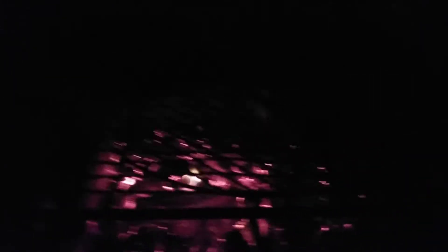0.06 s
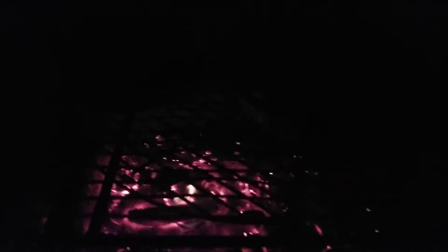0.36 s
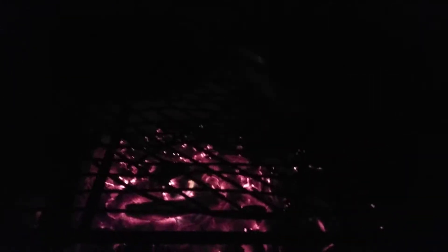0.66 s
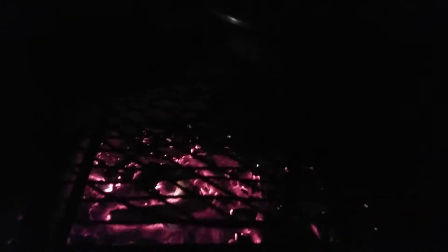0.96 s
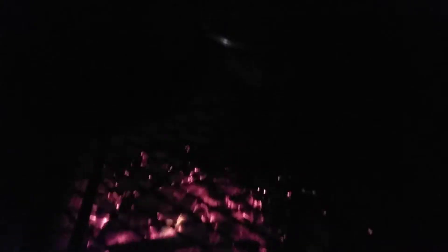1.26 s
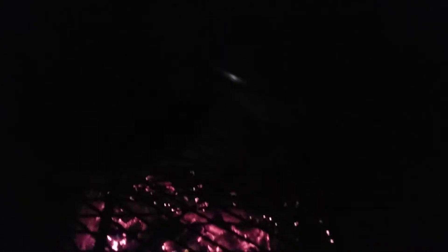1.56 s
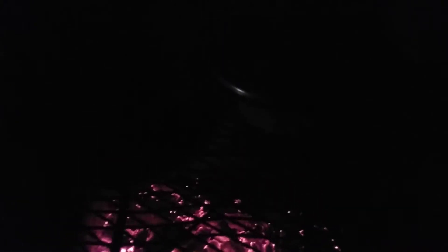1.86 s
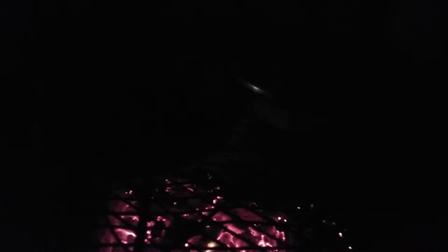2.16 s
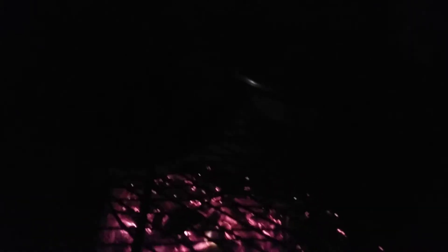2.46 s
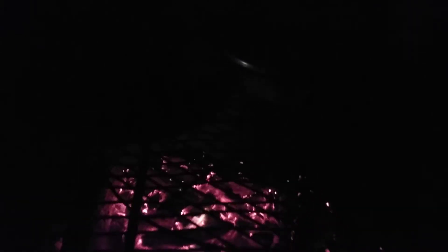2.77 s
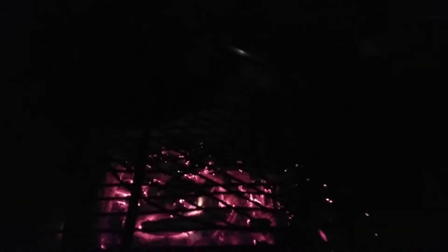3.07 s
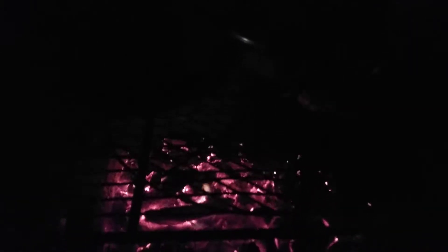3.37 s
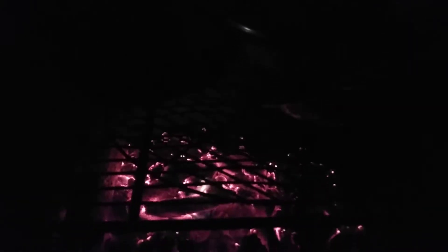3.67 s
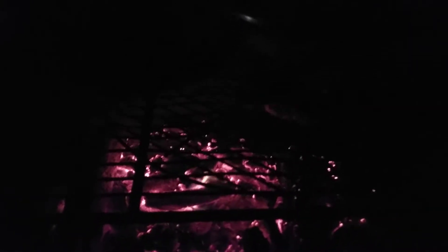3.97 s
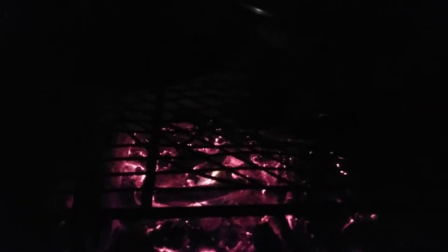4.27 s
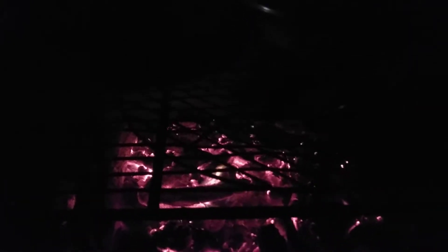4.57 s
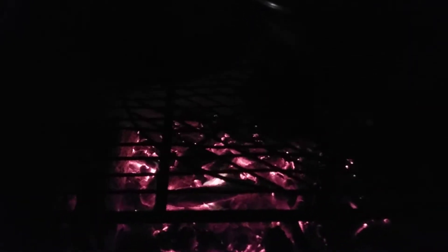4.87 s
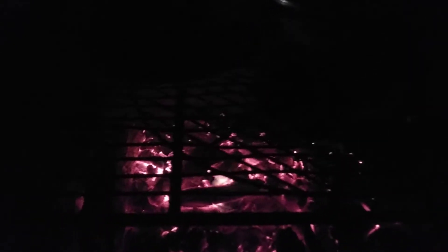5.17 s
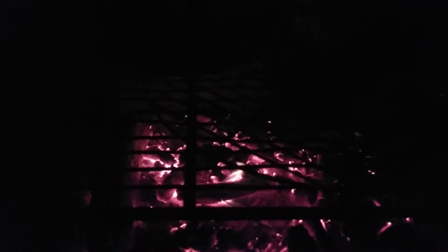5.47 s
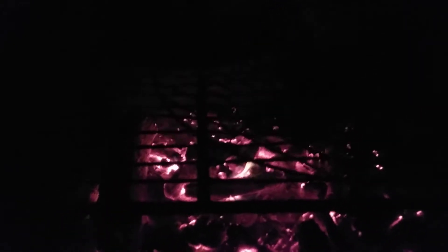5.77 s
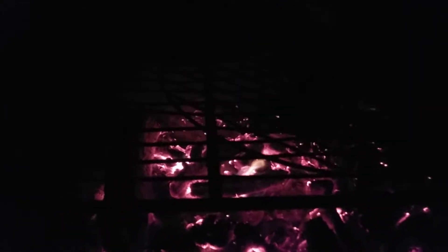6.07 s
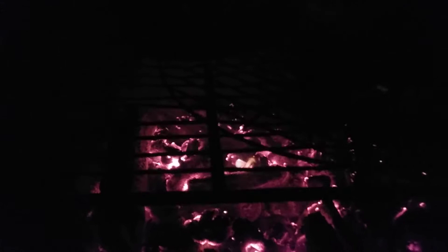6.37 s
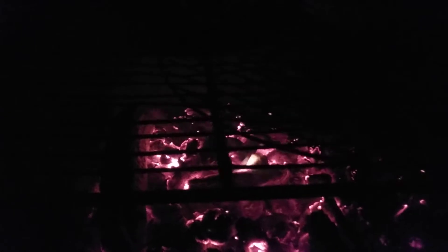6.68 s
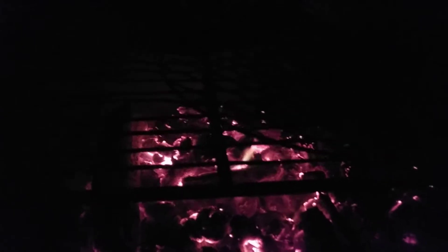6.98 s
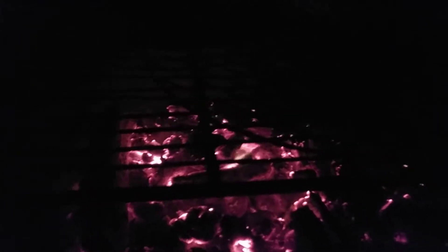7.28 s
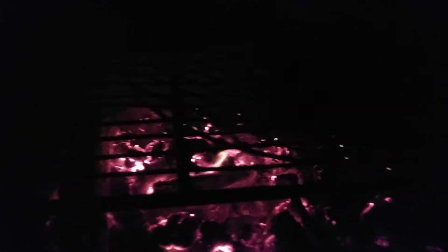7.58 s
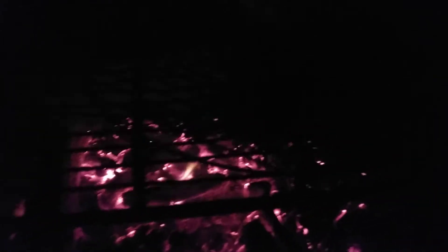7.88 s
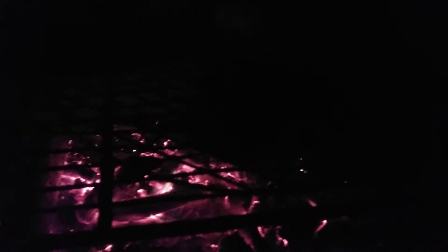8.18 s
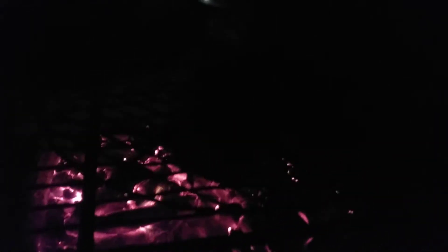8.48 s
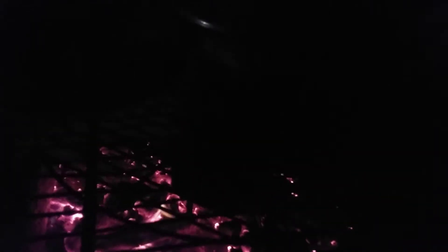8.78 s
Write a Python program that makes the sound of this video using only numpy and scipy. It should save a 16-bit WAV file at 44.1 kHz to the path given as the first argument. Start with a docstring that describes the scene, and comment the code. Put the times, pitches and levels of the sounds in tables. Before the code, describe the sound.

A steel grate grinds over a charcoal grill, then a metal utensil clinks, scrapes and screeches on the bars above faintly ticking embers.

```python
"""A steel grate grinds over the hollow firebox of a charcoal grill, outdoors at night.
Stick-slip friction drives the grate's resonances, and the firebox hums on after it. Embers hiss and
tick throughout, over a soft rush of air, and the charcoal twice gives a dry crack. A blade clinks on
the bars (impacts exciting damped modes), scrapes along them (friction feeding its bending modes),
then screeches under a hard shove and springs free to ring alone."""
import sys
import numpy as np
from scipy import signal
from scipy.fft import rfft, irfft, next_fast_len
from scipy.io import wavfile
from scipy.ndimage import uniform_filter1d, minimum_filter1d, map_coordinates

SR = 44100
rng = np.random.default_rng(int(sys.argv[2]) if len(sys.argv) > 2 else 0)


def transcribe(u):
    """Save the signal u as a 16-bit wav file named by the first command-line argument.

    u: samples, shape (n,) or (channels, n), limited to [-1, 1]; the rate is SR.
    q: integer samples, one column per channel.
    """
    v = np.clip(np.atleast_2d(u).T, -1, 1)
    q = np.round(v * 32767).astype(np.int16)
    wavfile.write(sys.argv[1], SR, q)


N = 393501


def amp(db):
    """Decibels to amplitude ratio."""
    return 10 ** (np.asarray(db) / 20)


def unit(x):
    """Normalisation to rms 1."""
    return x / np.sqrt(np.mean(x ** 2) + 1e-20)


def along(points, hz):
    """Interpolation of (frequency_hz, value) points on a log frequency axis."""
    f, values = np.transpose(points)
    return np.interp(np.log(hz + 1), np.log(f + 1), values)


def curves(rows):
    """Linear interpolation in time: one value per sample for each column after the first."""
    times, *columns = np.transpose(rows)
    return [np.interp(np.arange(N) / SR, times, column) for column in columns]


def swell(start_s, attack_s, hold_s, release_s, depth_db=24.5):
    """Exponential envelope: a gain rises, holds and falls evenly in dB, then drops away."""
    t = np.arange(N) / SR - start_s
    below = np.clip(np.maximum(1 - t / attack_s, (t - attack_s - hold_s) / release_s), 0, 2)
    return amp(-depth_db * np.maximum(below, below ** 3)) * (t > 0)


def wobble(rate_hz):
    """Random modulation: a smooth curve through rate_hz knots a second."""
    knots = rng.standard_normal(int(N * rate_hz / SR) + 4)
    return map_coordinates(knots, [np.arange(N) * rate_hz / SR])


def filtered(x, response):
    """Linear filtering: the spectrum of x times a frequency response."""
    size = next_fast_len(len(x) + 8192)
    return irfft(rfft(x, size) * response(np.fft.rfftfreq(size, 1 / SR)), size)[:len(x)]


def band(x, lo_hz, hi_hz, order=3):
    """Causal band-pass filtering."""
    sections = signal.butter(order, [lo_hz, min(hi_hz, SR / 2 - 1)], "band", fs=SR, output="sos")
    return signal.sosfilt(sections, x)


def resonate(x, modes):
    """Forced vibration: x drives (pitch_hz, width_hz, level_db) modes of alternating sign."""
    return filtered(x, lambda f: sum(
        (-1) ** k * amp(db) * 1j * f * width / (hz * hz - f * f + 1j * f * width)
        for k, (hz, width, db) in enumerate(modes)))


def sing(x, hz, width_hz):
    """Resonance: x through a double pole whose frequency may glide, at rms 1."""
    carrier = np.exp(2j * np.pi * np.cumsum(hz * np.ones(N)) / SR)
    pole = np.exp(-np.pi * width_hz / SR)
    return unit(np.real(carrier * signal.lfilter([1], [1, -2 * pole, pole ** 2], x / carrier)))


def ringing(modes, t60, t):
    """Modal superposition: damped (pitch_hz, level_db, t60_ratio) sines of random strength and sign."""
    hz, mode_db, t60_ratio = np.transpose(modes)[:, :, None]
    sizes = amp(mode_db + 2.5 * rng.standard_normal(hz.shape)) * rng.choice([-1, 1], hz.shape)
    return np.sum(sizes * amp(-60 * t / (t60 * t60_ratio)) * np.sin(2 * np.pi * hz * t), 0)


def glide(x, ratio):
    """Resampling: all modes shift together by a pitch ratio."""
    return map_coordinates(x, [np.cumsum(ratio)], mode="wrap")


def shimmer(x, depth_db, width_hz, step_s):
    """Amplitude modulation: modes swell and fade independently as the contact changes."""
    hz, t, spectrum = signal.stft(x, SR, nperseg=512)
    knots = rng.standard_normal((int(hz[-1] / width_hz) + 2, int(t[-1] / step_s) + 2))
    field = map_coordinates(knots, np.meshgrid(hz / width_hz, t / step_s, indexing="ij"), order=1)
    return unit(signal.istft(spectrum * amp(depth_db * field), nperseg=512)[1][:N])


def friction(rate_hz, scatter, spread_db, smooth):
    """Stick-slip excitation: impulses of uneven spacing and size, over a share of smooth noise."""
    draw = rng.standard_normal((int(2 * rate_hz * N / SR), 2))
    at = (np.cumsum(np.exp(scatter * draw[:, 0])) * SR / rate_hz).astype(int)
    slips = np.bincount(at[at < N], amp(spread_db * draw[at < N, 1]), N)
    return unit(slips - slips.mean()) + smooth * rng.standard_normal(N)


def add(track, start_s, sound):
    """Superposition: mix a sound into the track."""
    span = track[max(round(start_s * SR), 0):][:len(sound)]
    span += sound[:len(span)]


# Force of the drag: time_s, force_db
DRAG_FORCE = [(0.0, -64), (0.368, -39.5), (0.556, -44.5), (0.626, -39), (0.682, -42), (0.826, -34.5),
              (0.99, -40.5), (1.006, -29.5), (1.072, -25.5), (1.084, -31.5), (1.112, -29.5), (1.142, -36),
              (1.202, -33.5), (1.396, -54.5), (1.47, -52.5)]
# Treble of the drag relative to its force: time_s, level_db
DRAG_SHEEN = [(0.1, -5), (0.4, -7.5), (0.86, -0.5), (1.05, -8), (1.15, -15), (1.4, -14.5)]
# Spectral envelope of the grinding: frequency_hz, gain_db
DRAG_SPECTRUM = [(35, -82), (60, -59), (168, -21), (268, -16.5), (346, -6.5), (469, 0), (903, -4.5),
                 (968, -7), (1470, 2.5), (2900, -9.5), (3940, -16), (5090, -11.5), (6580, -12),
                 (9130, -31.5), (13000, -36), (16000, -47)]
# Resonances of the grate: pitch_hz, width_hz, level_db
GRATE_MODES = [(868, 370, -3.5), (1527, 41, 2), (1980, 36, -6), (2176, 31, 3), (2720, 30, -13.5),
               (5020, 60, -14.5), (5100, 91, -13), (6000, 29, -0.5), (6890, 110, -17.5)]


def grate_drag(stop_db_per_s=140):
    """Stick-slip friction on the rim: one force drives rumble, rasp, sheen and the firebox's hum."""
    resting_s = np.maximum(np.arange(N) / SR - DRAG_FORCE[-1][0], 0)
    force_db = curves(DRAG_FORCE)[0] - stop_db_per_s * resting_s + 1.1 * wobble(44.44)
    grit = friction(rate_hz=2500, scatter=.8, spread_db=1, smooth=.65)
    grind = unit(grit) + .41 * unit(resonate(grit, GRATE_MODES))
    grind = filtered(grind, lambda hz: amp(along(DRAG_SPECTRUM, hz)))
    grind = shimmer(grind, depth_db=2.5, width_hz=200, step_s=.034)
    rumble = amp(-27 + .86 * force_db) * unit(band(grind, 85, 280, order=4))
    rasp = amp(force_db + .04) * unit(band(grind, 420, 3300))
    sheen = amp(force_db + curves(DRAG_SHEEN)[0]) * unit(band(grind, 4000, 23000))
    return rumble + rasp + sheen + firebox_hum(force_db)


def firebox_hum(force_db, t60=2.08):
    """Energy storage in a resonator: the firebox is fed by the drag and decays after it."""
    retained = 1e-6 ** (1 / (t60 * SR))  # share of energy kept per sample
    energy = signal.lfilter([1 - retained], [1, -retained], amp(force_db) ** 2)
    hum = sing(band(rng.standard_normal(N), 260, 600), 361.5, width_hz=97)
    return amp(-15.5) * np.sqrt(energy) * hum


# Spectral envelope of the night air: frequency_hz, gain_db
AIR_SPECTRUM = [(15, -63.5), (25, -31.5), (146, -26), (184, -16.5), (379, -4.5), (592, -1), (831, -2),
                (985, -3), (1220, -5), (2160, -8.5), (3450, -14.5), (4000, -16.5), (5200, -41),
                (8800, -120)]


def night_air():
    """Broadband ambient noise: a soft, distant rush over a faint even hiss."""
    level_db = -65.5 + .25 * wobble(2)
    rush = unit(filtered(rng.standard_normal(N), lambda hz: amp(along(AIR_SPECTRUM, hz))))
    return amp(level_db) * rush + amp(-74) * unit(band(rng.standard_normal(N), 2500, 17000))


# Strength of the embers' hiss: time_s, level_db
HISS_LEVEL = [(1.8, -71.5), (2.3, -72), (3.1, -67.5), (3.7, -75), (4.65, -64), (5.05, -69), (6.4, -58.5),
              (6.9, -65), (7.8, -59), (8.55, -63)]
# Spectral envelope of that hiss: frequency_hz, gain_db
HISS_SPECTRUM = [(1470, -44), (2500, -16.5), (3570, -27), (4080, -11), (6650, 0), (7130, -3.5),
                 (8730, -19.5), (10300, -14), (12500, -21), (13800, -23), (15200, -26), (16000, -24)]


def ember_hiss():
    """Shot noise: dense tiny impulses merge into a hiss, joined once by a soft, broader swell."""
    impulses = friction(rate_hz=4300, scatter=.91, spread_db=9, smooth=1.33)
    hiss = unit(filtered(impulses, lambda hz: amp(along(HISS_SPECTRUM, hz))))
    broad_hiss = unit(band(rng.standard_normal(N), 1500, 8000, order=1))
    flare = amp(-65) * swell(start_s=1.696, attack_s=.24, hold_s=.29, release_s=.75) * broad_hiss
    return flare + amp(curves(HISS_LEVEL)[0] + .4 * wobble(8)) * hiss


# The loudest ember ticks: start_s, level_db
LOUD_TICKS = [(1.1882, -27.5), (1.2984, -28), (1.4586, -36), (1.9051, -41), (2.2797, -41), (2.3386, -42),
              (2.4019, -39.5), (2.9223, -37.5), (3.0934, -44), (3.1393, -38.5), (3.6516, -35),
              (4.0751, -43.5), (6.341, -38), (7.237, -35), (7.2474, -41), (7.2814, -35.5), (8.0895, -38)]


def ember_ticks(pitch_hz=6550):
    """Acoustic emission: charcoal splits in ticks, a few loud, many faint, and one short flurry."""
    out, t = np.zeros(N), np.arange(SR // 40) / SR
    faint = [(when * N / SR, -61.5 + 13 * size ** 2) for when, size in rng.random((130, 2))]
    flurry = [(2.5 + .21 * when, -50.5 + 4 * size) for when, size in rng.random((14, 2))]
    for start_s, db in [*LOUD_TICKS, *faint, *flurry]:
        hz = pitch_hz * np.exp(.065 * rng.standard_normal())
        snap = band(rng.standard_normal(len(t)), 4100, 11000, order=2) * amp(-60 * t / .013)
        tick = np.sin(2 * np.pi * hz * t) * amp(-60 * t / .012) + .59 * snap
        add(out, start_s, amp(db + .5) * tick / np.abs(tick).max())
    return out


# Modes of the gripped blade and the bars: pitch_hz, level_db, t60_ratio
STEEL_MODES = [(574, -5.5, 1), (798, -3, 1.3), (1007, -4, 1), (1273, -0.5, 1), (1543, 1, 1.6),
               (1650, -2.5, .8), (1924, 3, 1.2), (2162, 3, 1), (2540, 2, 1.1), (3010, -6.5, .8),
               (3573, -3, 1), (4475, 1, .9), (4820, 0, 1), (4635, -2.5, .6), (5800, -4.5, .8),
               (6200, 7, .7), (5720, -5.5, 1), (6420, 1, .6), (6620, -5, .7), (7420, 0, 1.3),
               (8430, -0.5, .9), (8200, -10, 1.4), (10770, -9, 1), (13000, -22.5, .7)]
# Blade blows on the bars, plus two dry charcoal cracks (at 2.202 and 3.29 s):
# start_s, level_db, treble_over_middle_db, low_mode_hz, high_mode_hz, t60_s, rattle_db
CLINKS_AND_SNAPS = [(2.059, -50.5, -7.5, 2480, 4650, 0.033, -14),
                    (2.202, -23.5, 13, 2800, 5750, 0.033, -14), (3.29, -25.5, 7.5, 1940, 5550, .014, -24.5),
                    (3.797, -7.5, 15, 1500, 4686, .029, -6.5), (3.879, -39, -1.5, 1410, 4710, .018, -12),
                    (4.904, -30.5, -0.5, 1894, 5660, 0.03, 4.5), (5.124, -31, -0.5, 1370, 7600, .04, -11),
                    (5.147, -41, -2, 1350, 7540, 0.038, 3), (5.727, -32.5, 1, 1567, 4580, 0.028, 0),
                    (5.998, -28, -2.5, 1230, 7500, 0.061, -23), (6.119, -25.5, 14, 2040, 6950, .065, -4.5),
                    (8.608, -8, 12.5, 2050, 6780, 0.027, -4.5)]


def clinks_and_snaps():
    """Impulse excitation: a blade blow or charcoal crack gives a burst, a damped ring and a rattle."""
    out, t = np.zeros(N), np.arange(SR // 5) / SR
    for start_s, db, bright_db, low_hz, high_hz, t60, rattle_db in CLINKS_AND_SNAPS:
        ring = ringing([*STEEL_MODES, (low_hz, 12, 1.1), (high_hz, 9, 1)], t60, t)
        noise = rng.standard_normal((4, len(t)))
        crack = noise[0] * (3 * amp(-60 * t / .005) + .8 * amp(-60 * t / t60))
        firebox = 2.1 * band(noise[1], 680, 880, order=2) * amp(-60 * t / .5)
        rattle = .17 * ringing(STEEL_MODES, .2, t) + .62 * noise[2] * amp(-60 * t / .25)
        transient = ring + band(crack + amp(rattle_db) * (rattle + firebox), 150, 8600, order=1)
        thud_db = -20 - .69 * bright_db  # a brighter sound has less bass
        edge_db = -8.5 + 18 * np.log2(high_hz / 5900)  # a higher mode brings more top
        for weight_db, lo_hz, hi_hz in [(thud_db, 200, 780), (-bright_db, 1000, 2900),
                                        (0, 3400, 7300), (edge_db, 7200, 11000)]:
            part = band(transient, lo_hz, hi_hz)
            add(out, start_s, amp(db + weight_db - 10) * part / np.std(part[:SR // 50]))
        onset_db = db + edge_db - 6.5 + 9 * np.log2(.03 / t60)  # a shorter sound starts more brightly
        add(out, start_s, amp(onset_db) * band(noise[3], 12000, 17000) * amp(-60 * t / .012))
    return out


# Reverberation time around the grill: frequency_hz, t60_s
YARD_DECAY = [(200, .35), (1000, 1), (5000, 0.41), (12000, 0.095)]


def yard_reverb(x):
    """Reverberation: the firebox and nearby walls answer with a short diffuse tail."""
    hz, t, spectrum = signal.stft(rng.standard_normal(SR // 2), SR, nperseg=256)
    tail = signal.istft(spectrum * amp(-60 * t / along(YARD_DECAY, hz)[:, None]), SR, nperseg=256)[1]
    delayed = np.pad(x, (300, 0))
    return signal.fftconvolve(delayed, tail / np.linalg.norm(tail))[:N]


# The blade's edge catches and jumps: start_s, surge_db
EDGE_CATCHES = [(5.214, 7), (5.262, 7), (5.285, 4), (6.121, 16), (6.149, 5.5), (6.190, 3), (6.300, 1.5),
                (8.658, 4), (8.685, 2.5), (8.712, 2.5), (8.746, 8)]


def edge_catches():
    """Stick and release: a gain on the blade's rubbing that surges at each catch, then relaxes."""
    surge_db, t = np.zeros(N), np.arange(SR // 10) / SR
    for start_s, db in EDGE_CATCHES:
        add(surge_db, start_s, db * np.exp(-(t / .01) ** 2))
    return amp(surge_db)


# Bending modes of the blade: pitch_hz, width_hz, level_db
BLADE_MODES = [(4730, 160, -2), (6060, 170, 0), (6150, 23, -4), (7060, 230, -3.5), (7700, 23, 0),
               (7950, 43, -10.5), (8340, 130, -3.5), (7940, 41, -10), (8200, 31.7, -13.5),
               (10600, 130, -12), (11900, 46, -12.5), (14300, 69, -26)]
# The moving point of contact: time_s, squeal_hz, looseness (0-1), upper_mode_pitch_ratio
CONTACT_PATH = [(4.1, 1560, 0.94, 0.93), (4.38, 1680, 1, 0.92), (4.5, 2060, 0.93, 0.94),
                (5.2, 2108, 0.15, 1), (5.3, 2013, 0.16, 0.99), (5.4, 1910, 1, .97), (5.55, 1990, 1, 1),
                (6.16, 2072, 0.1, 1.02), (6.22, 2115, 0, 0.98), (6.33, 2050, 0.04, 0.96)]
# Light strokes: start_s, attack_s, hold_s, release_s, scratch_db, squeal_db, groan_db, fizz_db,
# squeal_lead_s
LIGHT_STROKES = [(3.98, 0.52, .055, .045, -55.5, -56, -50.5, -68, 0),
                 (5.16, .18, .21, 0.13, -44.5, -37.5, -42.5, -59.5, 0.085),
                 (5.992, 0.049, .012, .03, -52, -64, -36, -73, 0),
                 (6.113, .06, 0.035, .13, -31.5, -25, -41, -47, 0.0036)]


def blade_scrapes(whine_cap_db=-57, groan_crest=.6):
    """Friction-driven resonance: fine slips feed the blade's modes, each with its own pressure law."""
    rub = friction(rate_hz=800, scatter=.7, spread_db=3, smooth=.45) * amp(1.5 * wobble(90))
    squeal_hz, loose, ratio = curves(CONTACT_PATH)
    loose = np.clip(loose, 0, 1)
    squeal = np.sqrt(1 - loose) * sing(rub, squeal_hz, width_hz=91)
    squeal += np.sqrt(loose) * sing(rub, squeal_hz, width_hz=330)
    groan = sing(rub, 1267, width_hz=157)
    whine = sing(rub, 6080 * ratio, width_hz=460)
    steel = glide(unit(resonate(rub, BLADE_MODES)) + .55 * unit(rub), ratio)
    steel = shimmer(steel, depth_db=5, width_hz=350, step_s=.025)
    scratch, fizz = unit(band(steel, 3740, 9800)), unit(band(steel, 10400, 13000))
    out = np.zeros(N)
    for start_s, attack, hold, release, scratch_db, squeal_db, groan_db, fizz_db, lead in LIGHT_STROKES:
        pressure = swell(start_s, attack, hold, release)
        squeal_swell = swell(start_s + lead / 2, attack - lead, hold - lead / 2, release - lead / 2)
        # the groan peaks part-way through the hold
        groan_swell = swell(start_s, attack + groan_crest * hold, 0, release + (1 - groan_crest) * hold)
        out += pressure * (amp(scratch_db) * scratch + amp(fizz_db) * fizz)
        out += np.minimum(amp(scratch_db + 1) * pressure, amp(whine_cap_db)) * whine
        out += amp(squeal_db) * squeal_swell ** .81 * squeal
        out += amp(groan_db) * groan_swell ** 1.3 * groan
    return band(edge_catches() * out, 650, 18000, order=4)


# Modes of blade and bars pressed together: pitch_hz, width_hz, level_db
JAMMED_MODES = [(1877, 41, -6.5), (2168, 42, -4), (2613, 83, -7), (3247, 64, -19), (3644, 160, -18),
                (4776, 42, -4), (4940, 28, -8.5), (5270, 78, -19.5), (6165, 20, -1), (6740, 24, -10),
                (6900, 45, 1.5), (7300, 23, -19), (7600, 81, -15.5), (8350, 70, -9.5), (8930, 36, -29),
                (9720, 42, -23.5), (10600, 32, -28.5), (12240, 67, -28), (13100, 73, -27.5),
                (14720, 140, -32.5)]
# The modes sag as the shove eases: time_s, pitch_ratio
MODE_SAG = [(8.61, 1.014), (8.69, 0.98), (8.72, 0.97), (8.76, .985)]
# Registers that hold, then die as the hand eases: low_hz, high_hz, level_db, hold_s, fall_db_per_s
SCREECH_BANDS = [(974.5, 3450, -18, 0.057, 293), (4750, 9800, -13.5, 0.11, 520),
                 (11560, 18500, -35.5, .085, 260)]


def blade_screech(start_s=8.61, end_s=8.8, rebound_delay_s=.027, rebound_width_s=.0082):
    """Nearly periodic stick-slip: shoved hard, the blade chatters and drives the coupled modes."""
    t = np.arange(N) / SR
    chatter = friction(rate_hz=410, scatter=.2, spread_db=1.5, smooth=.47)
    steel = glide(resonate(chatter, JAMMED_MODES), curves(MODE_SAG)[0])
    steel = shimmer(steel, depth_db=4, width_hz=200, step_s=.02)
    screech = sum(amp(db - fall * np.maximum(t - start_s - hold, 0)) * unit(band(steel, lo_hz, hi_hz))
                  for lo_hz, hi_hz, db, hold, fall in SCREECH_BANDS)
    # pressure dips as the blade rebounds from its landing
    screech *= amp(-4 * np.exp(-((t - start_s - rebound_delay_s) / rebound_width_s) ** 2))
    return band(edge_catches() * screech * (t > start_s) * (t < end_s), 880, 18400)


# Modes of the blade alone: pitch_hz, level_db, t60_s
FREE_MODES = [(2090, -19.5, 0.19), (2507, -8, 0.18), (3542, -3, 0.059), (5950, -3.5, 0.065),
              (7430, -16.5, 0.14), (8300, -12, 0.06), (8800, -7, 0.049)]
# Last brushes as the blade lifts: start_s, level_db, contact_s
LAST_BRUSHES = [(8.772, -17.5, 0.022), (8.822, -19, 0.012)]


def blade_springs_free():
    """Free vibration: the lifted blade and the last bar it brushes ring down."""
    out, t = np.zeros(N), np.arange(SR // 3) / SR
    bar_mode = (1545, -18.5, .13)
    ring = sum(amp(db - 60 * t / t60) * np.sin(2 * np.pi * hz * t)
               for hz, db, t60 in [*FREE_MODES, bar_mode])
    for start_s, db, contact_s in LAST_BRUSHES:
        brush = .33 * band(rng.standard_normal(len(t)), 1230, 10000) * amp(-60 * t / .11)
        onset = 1 - np.exp(-(t / contact_s) ** 2)
        add(out, start_s, amp(db) * (ring + brush) * onset)
    return out


def scene():
    """Superposition at one point: all sources, with faint reverberation of clinks, snaps and rubs."""
    transients = clinks_and_snaps()
    rubs = blade_scrapes() + blade_screech() + blade_springs_free()
    direct = grate_drag() + transients + rubs
    reverb = yard_reverb(amp(-25) * transients + amp(-31) * rubs)
    return (direct + reverb + ember_ticks() + ember_hiss() + night_air())[None]


def record(dry):
    """Peak limiting and band limiting: the loudest peaks are held, and overload leaves a low thump."""
    ceiling, top_hz = .68, 16100
    magnitude = np.abs(dry[0]) + 1e-9
    gain = np.minimum(1, ceiling / magnitude)
    gain = uniform_filter1d(minimum_filter1d(gain, size=61), size=61)
    thump = .9 * band(np.maximum(magnitude - .7, 0), 25, 404, order=1)
    return filtered(dry[0] * gain + thump, lambda hz: hz < top_hz)[None]


dry = scene()
out = record(dry)
transcribe(out)
```